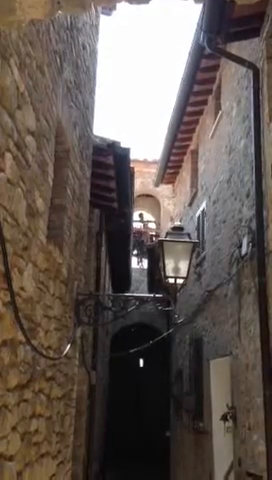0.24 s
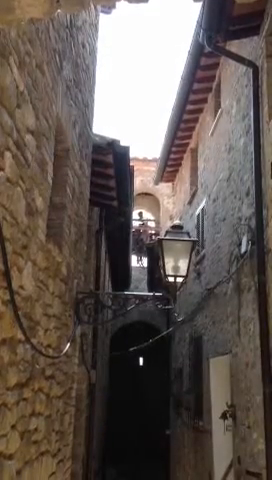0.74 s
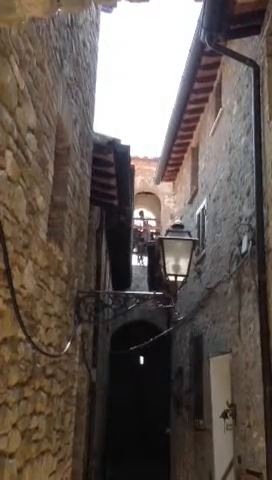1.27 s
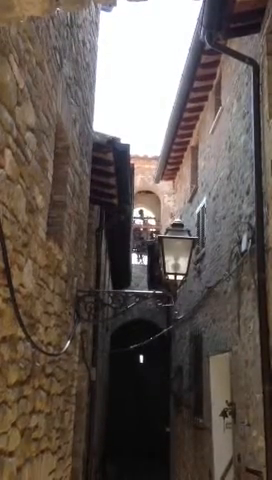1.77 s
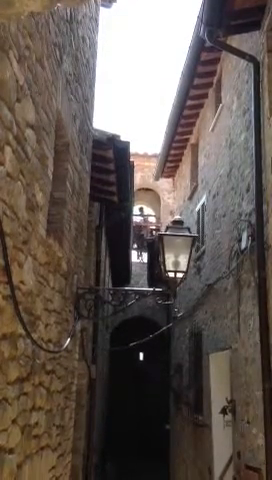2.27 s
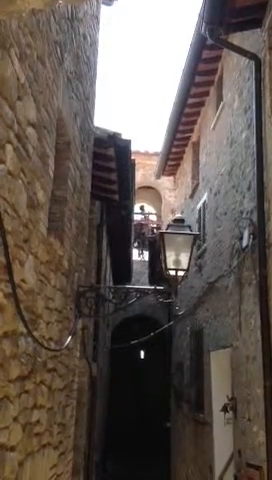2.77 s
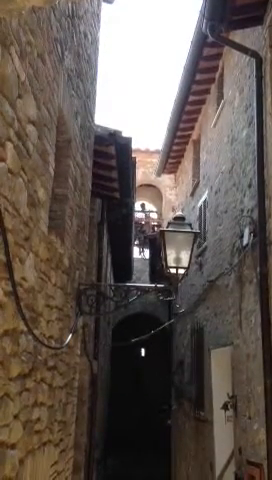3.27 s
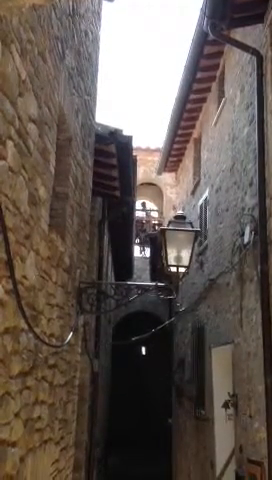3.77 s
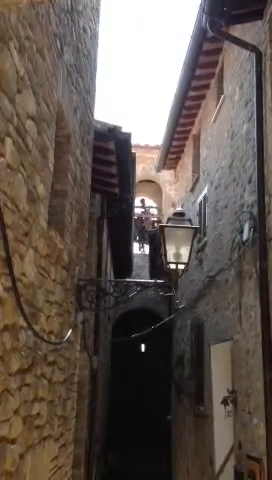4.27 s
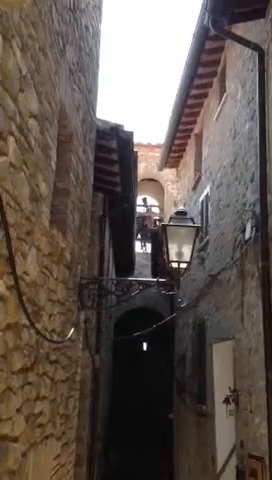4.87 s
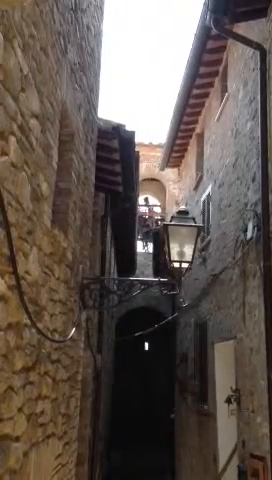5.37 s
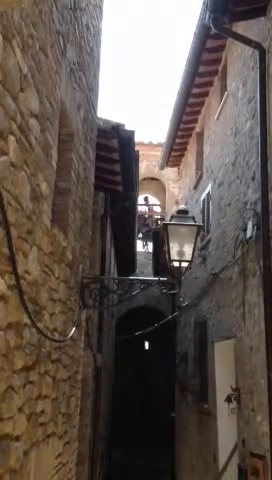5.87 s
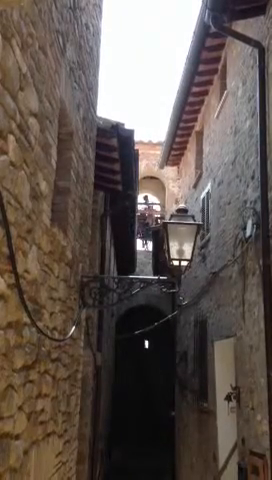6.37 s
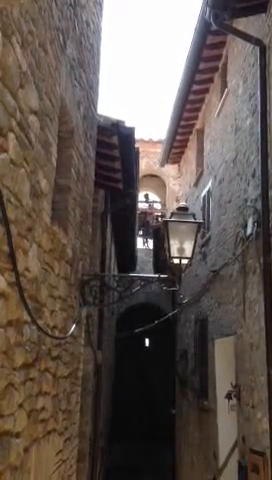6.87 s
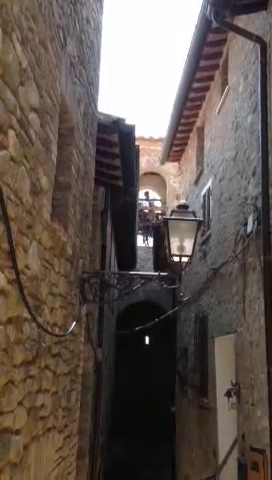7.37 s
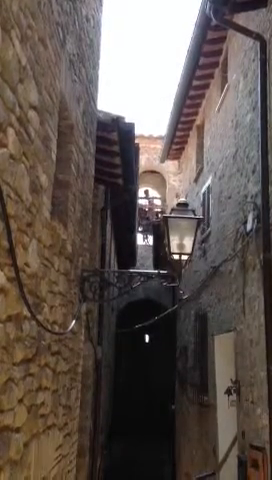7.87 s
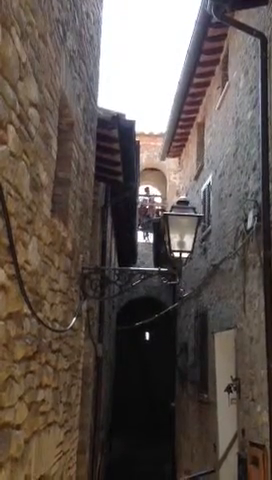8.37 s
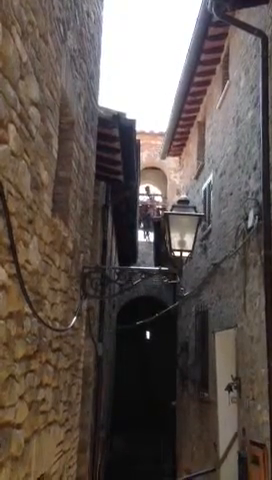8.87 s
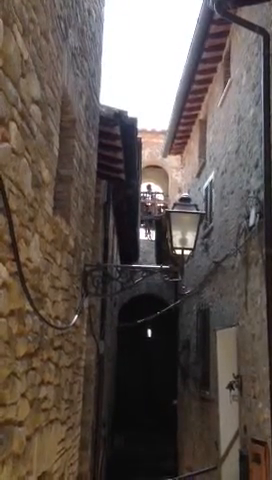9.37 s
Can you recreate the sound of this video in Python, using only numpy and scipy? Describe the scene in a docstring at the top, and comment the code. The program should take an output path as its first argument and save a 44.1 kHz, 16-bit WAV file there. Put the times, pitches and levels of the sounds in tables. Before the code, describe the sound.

A large tower bell swings and tolls about once a second above a narrow stone alley, bright clanging strokes over a lingering, wavering hum.

```python
"""A tower bell swings above a narrow stone alley; the clapper strikes its two sides in turn.
Its partials are decaying sines; near lip, far lip and wall echoes interfere as the mouth turns, so they waver.
Each blow also sets off a clang between the walls, made of noise bands that die at their own rates.
Steady noise bands make the far town and air; short swells of grainy hiss make the headstock's rasp."""
import sys
import numpy as np
from scipy import signal
from scipy.io import wavfile

SR = 44100
rng = np.random.default_rng(int(sys.argv[2]) if len(sys.argv) > 2 else 0)


def file_out(sig):
    """Save sig as 16-bit WAV at sys.argv[1]."""
    # one column per channel
    cols = np.atleast_2d(sig).T
    # limit, then scale
    lim = np.clip(cols, -1, 1)
    pcm = np.round(lim * 32767).astype(np.int16)
    wavfile.write(sys.argv[1], SR, pcm)


N = 424683

# clapper blows, forward and backward in turn: t/s, strength/dB, brightness/(dB per octave),
# ring level 0.5 s after the blow/dB x4 (hum, prime, tierce, nominal),
# far-lip phase shift/cycles x4 (same partials), favour of the four loudest upper partials/dB x4
BLOWS = [(-.75, 0, 0, -45, -44.5, -34.5, -36.5, -.02, 0, 0, 0, 3, 1, -3, 1),
         (.248, 2, -.5, -44, -42, -37, -34, .06, 0, .04, -.12, -1, 1, 0, 1),
         (1.402, 2, 1.5, -47.5, -36.5, -39.5, -35, .15, 0, 0, -.04, 3, 0, -3, 0),
         (2.404, 1, .5, -43.5, -36, -36, -36.5, .03, 0, 0, -.05, -2, -1, -2, -1),
         (3.544, 1, -2.5, -45.5, -45.5, -32, -36.5, 0, 0, 0, -.01, -3, 3, -2, 2),
         (4.547, 2, .5, -44, -44, -38, -39, -.06, 0, 0, -.01, -1, -1, 2, 1),
         (5.678, 1, -2, -43.5, -43, -35, -35.5, -.05, 0, 0, -.03, -1, 2, 0, 2),
         (6.675, -1, 0, -43, -48, -36, -43.5, -.13, 0, 0, .11, -1, 4, 2, -3),
         (7.828, 0, .5, -42, -43, -33.5, -36, -.05, 0, 0, 0, 1, -5, 4, -5),
         (8.785, -3, 0, -41.5, -42.5, -35, -45.5, -.01, 0, 0, .12, 5, -3, -1, 1)]
# hum, prime, tierce, nominal: f/Hz, t60/s, rise/s, range of phase knock/cycles, shimmer exponent/1,
# then for far lip and for wall echo: level/dB, phase/cycles, path swing/ms, swing lag/cycles
LONG_PARTIALS = [(234.8, 13.3, .07, .05, .2, -7.05, -.23, -1.74, .13, -4.06, .07, 1.93, .14),
                 (475, 7.7, .012, 1, .3, -3.13, -.09, -.71, .18, -3.57, -.3, .61, .3),
                 (588.4, 11, .012, 1, .3, 1.4, .5, .8, .6, -4.27, -.11, .75, .12),
                 (1012.3, 4.7, .055, 1, .3, .03, .1, -.79, .1, -2.93, .43, .54, .09)]
# upper partials: f/Hz, forward-blow level/dB, backward-blow level/dB, t60/s
UPPER_PARTIALS = [(729, -51, -55, 8), (1234, -33, -32, 2), (1298, -42, -38, 2.4), (1524.6, -22, -28, 2),
                  (1595, -43, -35, 1.9), (1935, -44, -46, 1.4), (2013, -42, -48, 1.4),
                  (2105, -20, -29, 1.7), (2220, -46, -50, 1.5), (2411, -42, -47, 2), (2575, -40, -45, 1.3),
                  (2747, -22, -29, 2.5), (2834, -42, -46, 1.5), (2945, -39, -50, 1.5),
                  (3290, -37, -36, 1.6), (3427, -23, -30, 1.8), (3766, -42, -37, 1.3),
                  (4064, -42, -44, 1.2), (4134, -27, -30, 1.5), (4224, -37, -42, 1.4),
                  (4738, -42, -48, 1.2), (4859, -26, -36, 1.4), (5050, -41, -46, 1.2),
                  (5594, -35, -38, 1.3), (5720, -43, -46, 1.2), (6302, -38, -40, 1.3),
                  (6488, -43, -47, 1.2), (7018, -42, -45, 1.2), (7267, -49, -53, 1.1),
                  (7460, -50, -54, 1.1), (7720, -49, -53, 1.1)]
# upper partials that depend on the spot hit: f/Hz
LOUDEST_HZ = [1524.6, 2105, 2747, 3427]
# ways from moving bronze to ear: level/dB, mean path/ms, path swing/ms, swing lag/cycles
PATHS = [(0, 0, .8, .1), (-3, 21.7, -.7, .12), (-6, 34.3, .3, .3), (-8, 47.1, -.25, .4),
         (-9, 13.9, 1.1, .22)]
# trend of the small partials: f/Hz, mean forward-blow level/dB, t60/s
CROWD = [(1900, -56, .7), (3500, -52, .8), (5500, -47, 1.1), (8000, -51.5, 1.0), (11000, -63, .75),
         (15000, -80, .55)]
# clang between the walls: f/Hz, level per half-octave band/dB, t60/s
CLANG = [(60, -75, .3), (150, -63, .5), (400, -51, .5), (1200, -40, .3), (2500, -32, .26), (5000, -34, .26),
         (8000, -46, .35), (11000, -55, .35), (15000, -68, .3)]
# far town and air: f/Hz, level per half-octave band/dB
TOWN = [(25, -92), (60, -90), (115, -88), (175, -60), (300, -76), (800, -81), (2000, -82), (4500, -72),
        (8000, -77), (15000, -76)]
# headstock rasps: t/s, length/s, peak level/dB
RASPS = [(1.03, .25, -58), (3.24, .25, -60), (5.35, .2, -64), (7.3, .2, -68), (9.4, .25, -54)]
# rasp passband edges: f/Hz
RASP_BAND_HZ = (4000, 5700)

STEP_SAMPLES = 64  # spacing of slow curves
RISE_S = .009  # build-up by walls and tower arch
SHIMMER_DB, SHIMMER_HZ = -13, 22
BRIGHT_REF_HZ = 2500
BASS_CUT_HZ, TREBLE_CUT_HZ = 110, 15350


def amp(db):
    """Decibels to gain."""
    return 10 ** (np.asarray(db) / 20)


def fall_db(age_s, t60_s):
    """Exponential decay: 60 dB lost per t60."""
    return 60 * age_s / t60_s


def at_hz(rows, hz):
    """Table columns interpolated on a log-frequency axis."""
    f_hz, *columns = np.transpose(rows)
    return [np.interp(np.log(hz), np.log(f_hz), column) for column in columns]


def slow_time():
    """Times/s of the slow-curve points."""
    return np.arange(N // STEP_SAMPLES + 2) * STEP_SAMPLES / SR


def full(slow):
    """Slow curve interpolated to every sample."""
    return np.interp(np.arange(N) / STEP_SAMPLES, np.arange(len(slow)), slow)


def since_blow():
    """Index of the latest blow and seconds since it."""
    times_s = np.array(BLOWS)[:, 0]
    latest = np.searchsorted(times_s, slow_time()) - 1
    return latest, slow_time() - times_s[latest]


def swing(lag_cycles):
    """Lip position, -1 to 1: a cosine of one cycle per two blows."""
    marks_s = np.array(BLOWS)[1::2, 0]
    before_s = 2 * marks_s[0] - marks_s[1]
    after_s = 2 * marks_s[-1] - marks_s[-2]
    marks_s = np.r_[before_s, marks_s, after_s]
    cycles = np.interp(slow_time(), marks_s, np.arange(len(marks_s)))
    return np.cos(2 * np.pi * (cycles - lag_cycles))


def risen(slow, rise_s=RISE_S):
    """One-pole lag that rounds the jumps of a slow curve."""
    pole = np.exp(-STEP_SAMPLES / SR / rise_s)
    return signal.lfilter([1 - pole], [1, -pole], slow, zi=[pole * slow[0]])[0]


def shimmer():
    """Blur by scattered echoes: one plus slow complex noise."""
    pole = np.exp(-2 * np.pi * SHIMMER_HZ * STEP_SAMPLES / SR)
    white = [1, 1j] @ rng.standard_normal((2, len(slow_time())))
    noise = signal.lfilter([1], [1, -2 * pole, pole * pole], white)
    return 1 + amp(SHIMMER_DB) * noise / noise.std()


def sines(hz, slow):
    """Sum of sines whose sizes and phases follow slow complex curves, one row each."""
    inside = np.arange(STEP_SAMPLES)
    turn = 2j * np.pi * np.array(hz)[:, None]
    slow = np.array(slow)
    start = np.exp(turn * slow_time()[:-1])
    block = np.exp(turn * inside / SR)
    held = (slow[:, :-1] * start).T @ block
    ramp = (np.diff(slow) * start).T @ (block * inside / STEP_SAMPLES)
    return (held + ramp).real.ravel()[:N]


def bandpass(noise, edges_hz):
    """Band of noise at rms 1."""
    sos = signal.butter(2, edges_hz, "band", fs=SR, output="sos")
    band = signal.sosfilt(sos, noise)
    return band / band.std()


def noise_bands():
    """Centres/Hz and half-octave bands at rms 1, cut from two noises in turn."""
    white = rng.standard_normal((2, N))
    edges_hz = 22 * 2 ** np.arange(0, 9.7, .5)
    for k, (low, high) in enumerate(zip(edges_hz, edges_hz[1:])):
        yield np.sqrt(low * high), bandpass(white[k % 2], [low, high])


def long_partials():
    """Blows add to or choke the lasting ring; near lip, far lip and wall echo interfere."""
    rings = []
    latest, age_s = since_blow()
    left_db = np.transpose(BLOWS)[3:7]
    shift_cycles = np.transpose(BLOWS)[7:11]
    for k, (hz, t60_s, rise_s, knock_cycles, blur, *ways) in enumerate(LONG_PARTIALS):
        level = amp(left_db[k][latest] - fall_db(age_s - .5, t60_s))
        knock = np.exp(2j * np.pi * knock_cycles * rng.random(len(BLOWS)))[latest]
        far_lip, echo = [
            amp(db) * np.exp(2j * np.pi * (phase_cycles + hz * path_ms / 1000 * swing(lag_cycles)))
            for db, phase_cycles, path_ms, lag_cycles in np.reshape(ways, (2, -1))]
        far_lip = far_lip * risen(np.exp(2j * np.pi * shift_cycles[k][latest]), rise_s)
        ring = risen(level * knock, rise_s)
        rings.append(ring * (1 + far_lip + echo) * shimmer() ** blur)
    return sines(np.array(LONG_PARTIALS)[:, 0], rings)


def crowd_modes(count):
    """Small partials scattered over 1.9-15.2 kHz; backward blows excite them 4 dB less."""
    hz = 1900 + (np.arange(count) + rng.random(count)) / count * 13300
    db, t60_s = at_hz(CROWD, hz)
    db = db + rng.normal(0, 3.5, count)
    return list(zip(hz, db, db - 4, t60_s))


def upper_partials(crowd_count):
    """Strong and small upper partials, rung anew at each blow, interfere along moving paths."""
    rings = []
    latest, age_s = since_blow()
    modes = UPPER_PARTIALS + crowd_modes(crowd_count)
    times_s, strength_db, bright = np.array(BLOWS)[:, :3].T
    count = len(times_s)
    backward = np.arange(count) % 2
    favour_db = np.array(BLOWS)[:, -len(LOUDEST_HZ):]
    gains = amp(np.array(PATHS)[:, 0])
    paths_s = np.array([mean_ms + path_ms * swing(lag_cycles)
                        for _, mean_ms, path_ms, lag_cycles in PATHS]) / 1000
    # no two swings are quite alike
    paths_s = paths_s + rng.normal(0, 1.5e-5, (len(PATHS), count))[:, latest]
    for hz, forward_db, backward_db, t60_s in modes:
        db = np.where(backward, backward_db, forward_db) + strength_db
        db = db + bright * np.log2(hz / BRIGHT_REF_HZ)
        db = db + favour_db @ np.isclose(hz, LOUDEST_HZ, rtol=.004)
        db = db + rng.normal(0, 1.0, count)
        blows = amp(db) * np.exp(2j * np.pi * rng.random(count))
        ring = risen(blows[latest] * amp(-fall_db(age_s, t60_s)))
        interference = gains @ np.exp(2j * np.pi * hz * paths_s)
        rings.append(ring * interference * shimmer())
    return sines(np.array(modes)[:, 0], rings)


def clang():
    """Noise between the walls: bursts at each blow, dies band by band."""
    latest, age_s = since_blow()
    strength_db, bright = np.array(BLOWS)[latest, 1:3].T
    out = np.zeros(N)
    for hz, band in noise_bands():
        db, t60_s = at_hz(CLANG, hz)
        octaves = max(np.log2(hz / BRIGHT_REF_HZ), -.4)
        blow_db = strength_db - 4.0 * (latest % 2) + bright * octaves  # backward blows 4 dB weaker
        out += band * full(risen(amp(db + blow_db - fall_db(age_s, t60_s))))
    return out


def town():
    """Far town and air: steady noise weighted band by band."""
    return sum(band * amp(at_hz(TOWN, hz)[0]) for hz, band in noise_bands())


def rasp():
    """Dry rub of the headstock: band-passed grainy hiss swells fast and fades."""
    grains = rng.standard_normal(N) * rng.exponential(1, N)
    t_s = slow_time()
    level = np.zeros(len(t_s))
    for start_s, length_s, db in RASPS:
        knots_s = [start_s, start_s + .04, start_s + .6 * length_s, start_s + length_s]
        level += amp(db) * np.interp(t_s, knots_s, [0, 1, .7, 0])
    return bandpass(grains, RASP_BAND_HZ) * full(level)


def scene():
    """Bell, walls, town and headstock summed at one microphone."""
    bell = long_partials() + upper_partials(crowd_count=90)
    return (bell + clang() + town() + rasp())[None]


def record(dry):
    """Microphone: gentle deep-bass cut, steep treble cut."""
    bass_cut = signal.butter(2, BASS_CUT_HZ, "high", fs=SR, output="sos")
    treble_cut = signal.ellip(10, .5, 60, TREBLE_CUT_HZ, fs=SR, output="sos")
    return signal.sosfilt(treble_cut, signal.sosfilt(bass_cut, dry))


dry = scene()
out = record(dry)
file_out(out)
```